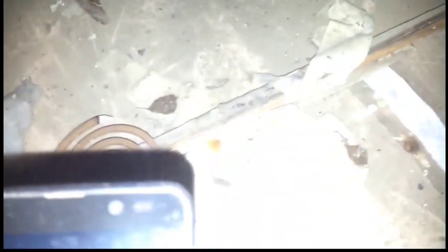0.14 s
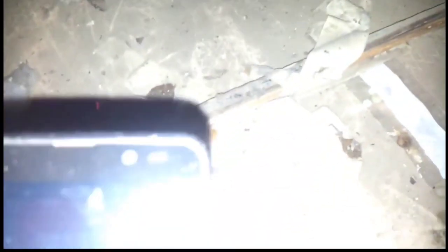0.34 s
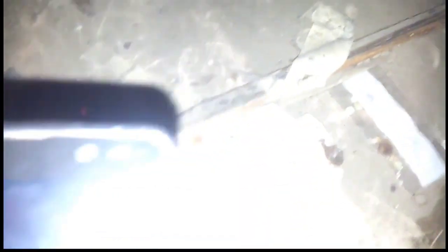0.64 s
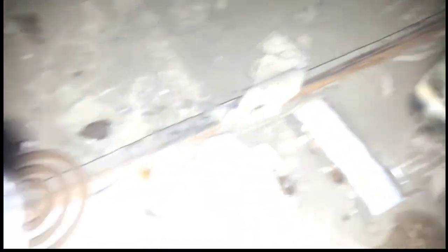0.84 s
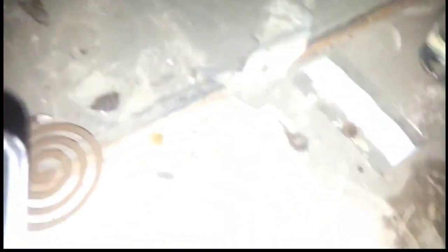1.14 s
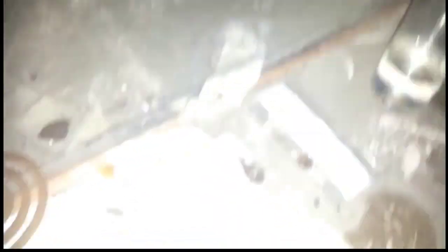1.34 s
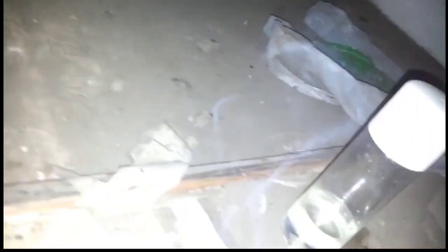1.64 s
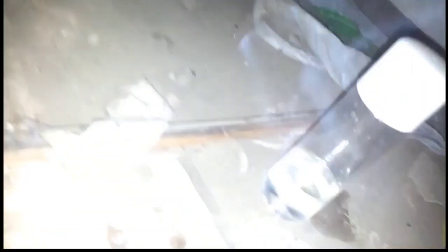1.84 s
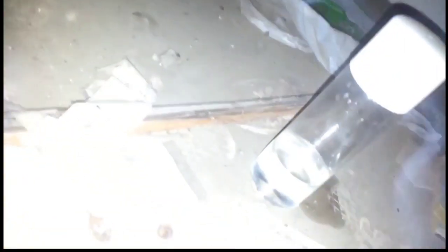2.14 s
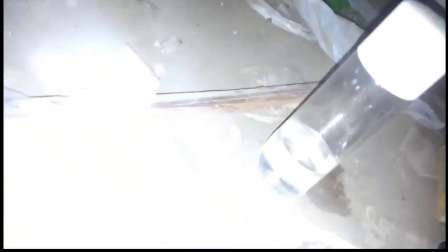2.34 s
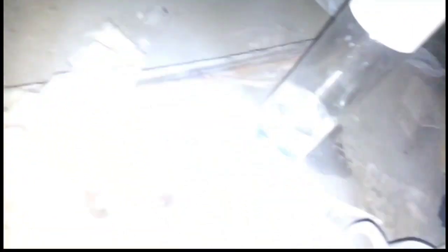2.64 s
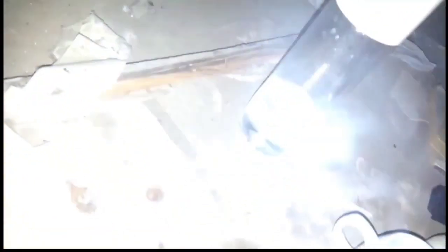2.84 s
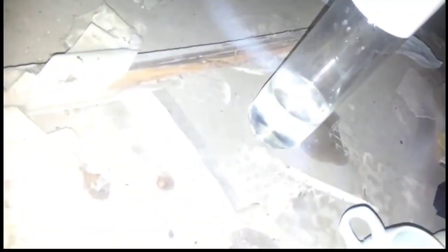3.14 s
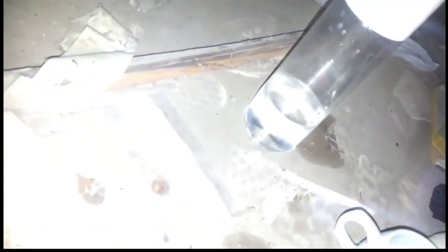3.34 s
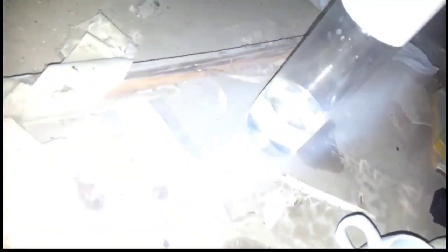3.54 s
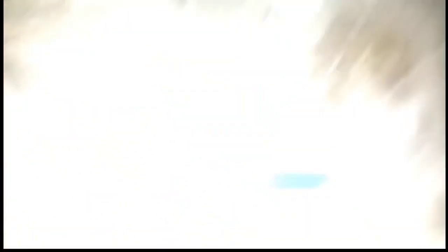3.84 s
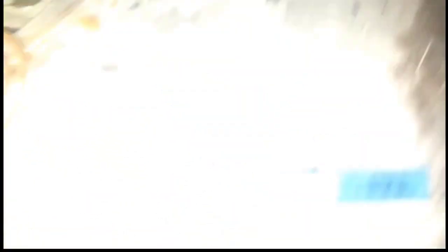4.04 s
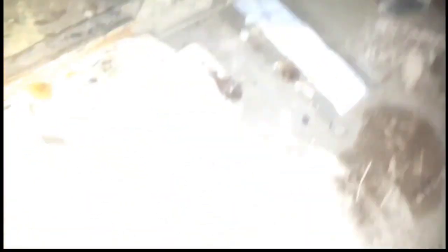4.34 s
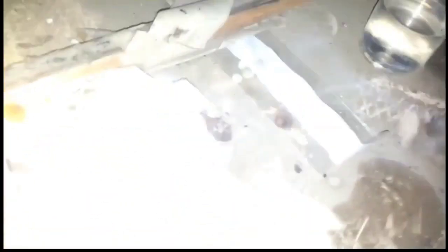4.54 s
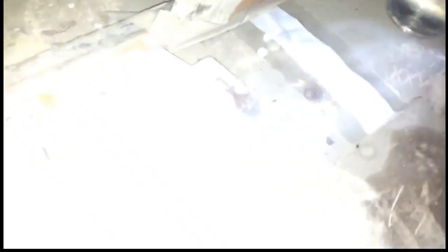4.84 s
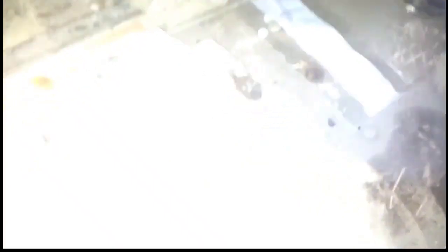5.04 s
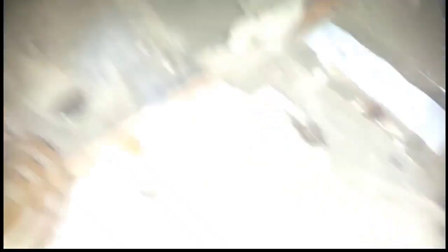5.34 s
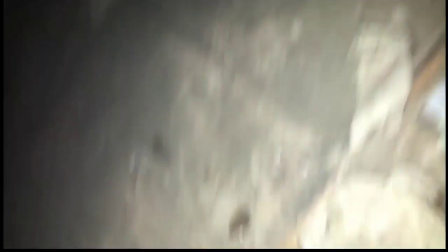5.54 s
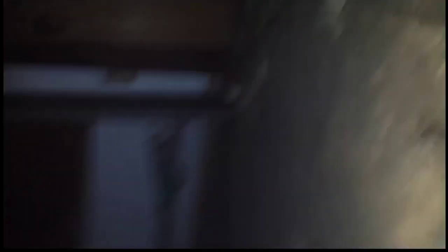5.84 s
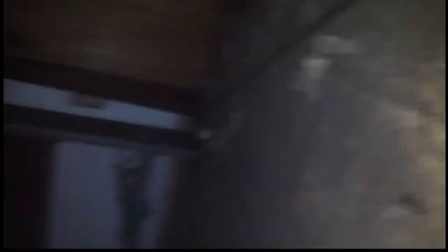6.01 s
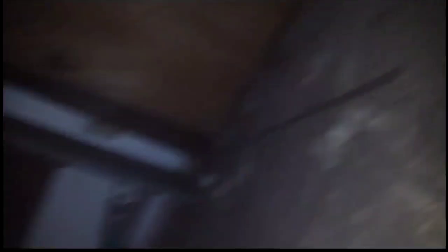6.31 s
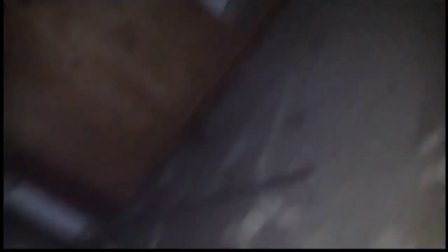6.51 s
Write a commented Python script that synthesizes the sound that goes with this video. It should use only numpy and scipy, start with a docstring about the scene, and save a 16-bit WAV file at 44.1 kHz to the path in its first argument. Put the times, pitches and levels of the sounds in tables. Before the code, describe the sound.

In a quiet room, fingers shift on a handheld camera: knocks, a gritty scrape, one overloaded bump, then faint hissy strokes and creaks.

```python
"""Fingers shifting on a handheld camera

In a quiet room, fingers shift their grip, and all of it reaches the microphone through the case.
Fingertips knock on the shell; one covers the microphone port and scrapes across it. Later the skin slides
in light strokes, hissing in the port's treble resonance, and creaks in three short pulls.
Knocks are short pushes plus ringing shell tones; rubbing is random skin catches shaped by a spectrum."""
import sys
import numpy as np
from scipy import signal
from scipy.fft import rfft, irfft, next_fast_len
from scipy.io import wavfile

SR = 44100
rng = np.random.default_rng(int(sys.argv[2]) if len(sys.argv) > 2 else 0)


def master(y):
    """Save y as 16-bit WAV."""
    cut = np.clip(np.atleast_2d(y).T, -1, 1)
    pcm = np.round(cut * 32767)  # scale
    wavfile.write(sys.argv[1], SR, pcm.astype(np.int16))


N = 294225
T = np.arange(N) / SR  # time in seconds

# The muffled sound of skin rubbing on the shell. Each row: frequency in Hz, relative level in dB.
MURMUR_COLOUR = [(20, -35.5), (60, -5.5), (130, -2.5), (380, -1.5), (900, -5.5), (2000, -10), (5000, -19.5),
                 (12000, -33.5)]


def undb(db):
    """Turn decibels into a gain."""
    return 10 ** (np.asarray(db) / 20)


def unit(x):
    """Scale to an average (rms) level of 1."""
    return x / np.sqrt(np.mean(x ** 2))


def peak(x):
    """Scale so the largest swing is 1."""
    return x / np.max(np.abs(x))


def add(out, s, sound):
    """Mix a short sound in at s seconds."""
    i = int(s * SR)
    out[i:i + len(sound)] += sound[:N - i]


def butter(x, hz, kind, order=2):
    """Filter with a low-, high- or band-pass that only looks back in time."""
    sos = signal.butter(order, np.minimum(hz, SR / 2 - 1), kind, fs=SR, output="sos")
    return signal.sosfilt(sos, x)


def colour(x, points):
    """Shape x by a spectrum of (Hz, dB) points, then scale to rms 1."""
    hz, db = np.transpose(points)
    size = next_fast_len(len(x))
    f = np.arange(size // 2 + 1) * SR / size
    gain = undb(np.interp(np.log(f + 1), np.log(hz), db))
    return unit(irfft(rfft(x, size) * gain, size)[:len(x)])


def fade(t, t60):
    """Die away exponentially, falling by 60 dB every t60 seconds."""
    return np.exp(-np.log(1000) * t / t60)


def swell(t, start, length, attack, release):
    """Rise to 1 at start, hold for length, die away; attack and release are times for 60 dB."""
    rise = fade(np.maximum(start - t, 0), attack)
    return rise * fade(np.maximum(t - start - length, 0), release)


def push(t, ms):
    """Contact force: a quick rise and a slower release, peak 1 after ms milliseconds."""
    u = t * 1000 / ms
    return (u * np.exp(1 - u)) ** 2


def walk(rate):
    """Random wander along straight lines between rate random points per second."""
    knots = rng.standard_normal(N // 8)
    return np.interp(T * rate, np.arange(len(knots)), knots)


def grains(rate, spread_db):
    """Skin ridges catch at random moments, rate per second on average, each with its own strength."""
    caught = rng.random(N) < rate / SR
    return caught * rng.choice([-1, 1], N) * undb(spread_db * rng.standard_normal(N))


def low_cut(x, hz=58, leak_hz=45):
    """The microphone's steep bass roll-off, which wobbles on after every push."""
    return butter(butter(x, hz, "high", order=5), leak_hz, "high", order=1)


def room():
    """Low rumble that follows the camera's movement, under the microphone's own even hiss."""
    # The camera is swung. Each row: start in seconds, length in seconds.
    swings = [(0, 1.54), (3.7, 0.33), (5.497, .25)]
    # Spectrum of the rumble. Each row: frequency in Hz, relative level in dB.
    rumble_colour = [(15, -57.5), (28, -26), (44, -4), (58, 0.5), (105, -7), (150, -16.5), (300, -40)]
    # Spectrum of the microphone's hiss. Each row: frequency in Hz, relative level in dB.
    floor_colour = [(20, -19), (70, -3.5), (200, -1), (400, -3.5), (1200, -7), (2500, -8), (5700, -11.5),
                    (13800, -10.5), (15000, -14.5)]
    rumble_db, floor_db = -76, -66.5
    swing_db, swing_ramp_s = 7, 1.2  # dB added at full swing; 60 dB time of the swell curve
    turn_s, turn_length_s, turn_db = 5.8, .3, -7  # the rumble drops as the camera turns away

    swung = sum(swell(T, s, length, swing_ramp_s, swing_ramp_s) for s, length in swings)
    turned = np.clip((T - turn_s) / turn_length_s, 0, 1)
    rumble_level = undb(rumble_db + swing_db * swung + turn_db * turned)
    rumble = rumble_level * colour(rng.standard_normal(N), rumble_colour)
    return rumble + undb(floor_db) * colour(rng.standard_normal(N), floor_colour)


def knocks():
    """Each knock is a pressure pulse, a slower flex of the shell the other way and a crack of its modes."""
    # Fingertips hit the case. Each row: start in seconds, pulse level in dB before the bass cut,
    # contact time in ms, shell flex in dB before the bass cut, flex time in ms, crack level in dB.
    knock_rows = [(1.0592, -30, .1, -29, 1.8, -38), (1.0897, -41.5, 0.28, -36, 1.8, -58),
                  (1.1196, -37, 0.27, -38, 1.5, -57), (1.1485, -31, 0.77, -34, 2.5, -47),
                  (1.1654, -9, 0.44, -17.5, 1.8, -40), (1.4796, -13, 0.15, -19.5, 1.57, -25),
                  (1.4817, -25, 0.12, -35, 0.66, -23.5), (3.6455, -61, 1, -36.5, 3.8, -80),
                  (3.8882, -33, .45, -26.5, 3.8, -52), (4.0350, -35.5, .24, -47.5, 1, -54.5),
                  (4.0547, -18, 0.38, -24, 1.4, -39.5), (4.0571, -1, .22, -9, .91, 2.5),
                  (4.4037, -32, .34, -43, 0.75, -43), (5.318, -45, 0.61, -52, .57, -66),
                  (5.4171, -29.5, .39, -51, .4, -38), (5.661, -47, 0.26, -53, 1, -58)]
    # Ringing tones of the shell. Each row: frequency in Hz, 60 dB fade time in seconds, relative level in dB.
    shell_modes = [(790, .012, 1), (1120, .012, -0.5), (1840, .008, -11), (3550, 0.0073, -0.5),
                   (4760, 0.0036, -5), (6247, 0.0093, 0.5), (7400, 0.0055, -2), (8700, 0.004, -2)]
    brush_db, brush_t60_s = -34.5, .044  # brushing against knock strength; 60 dB time on either side

    t = T[:SR // 5]
    pressure, cracks, contact = np.zeros(N), np.zeros(N), np.zeros(N)
    ring = peak(sum(undb(db) * fade(t, t60) * np.sin(2 * np.pi * hz * t) for hz, t60, db in shell_modes))
    for s, db, contact_ms, flex_db, flex_ms, crack_db in knock_rows:
        blow = peak(butter(push(t, contact_ms), 400, "high", order=1))
        add(pressure, s, -undb(db) * blow)
        # the shell gives at the top of the push
        top_s = s + contact_ms / 1000
        add(pressure, top_s, undb(flex_db) * push(t, flex_ms))
        crunch = butter(rng.standard_normal(len(t)), 5000, "low", order=1) * fade(t, 0.027)
        add(cracks, top_s, undb(crack_db) * (0.074 * crunch + ring))
        contact += undb(db) * fade(np.abs(T - s), brush_t60_s)
    # skin brushes the shell as it lands and lifts
    brush = undb(brush_db) * contact * colour(grains(4000, 2.5), MURMUR_COLOUR)
    return low_cut(pressure) + cracks + brush


def slips(events):
    """Every slip (seconds, tick dB, body dB) ticks in the port resonance and nudges the shell."""
    port_hz, port_width_hz = 10700, 1300
    band = port_hz + np.array([-1, 1]) * port_width_hz / 2
    t, ticks, body = T[:SR // 50], np.zeros(N), np.zeros(N)
    for s, tick_db, body_db in events:
        envelope = (fade(t, 0.0045) + 0.073 * fade(t, 0.014)) * (1 - fade(t, 0.0016))
        snap = rng.standard_normal(len(t)) * envelope
        rung = butter(snap, band, "band", order=1)
        add(ticks, s, undb(tick_db) * peak(rung + 0.056 * snap))
        add(body, s, -undb(body_db) * push(t, 0.24))
    return ticks + butter(body, 214, "high")


def press():
    """A tense fingertip shudders on the shell, and rustles dully once it starts to give."""
    press_s, give_s, end_s = 1.093, 1.153, 1.18
    attack_s, release_s = 0.13, .1  # times to rise and fall by 60 dB
    tremor_hz, tremor_db, rustle_db = 64, -36.5, -47

    tremor = swell(T, press_s, end_s - press_s, attack_s, release_s)
    rustle = swell(T, give_s, end_s - give_s, attack_s, release_s)
    wandering_hz = tremor_hz * (1 + 0.16 * walk(45))
    shudder = np.sqrt(2) * np.sin(2 * np.pi * np.cumsum(wandering_hz) / SR)  # rms near 1
    rub = colour(grains(2500, 4), MURMUR_COLOUR)
    return undb(tremor_db) * tremor * shudder + undb(rustle_db) * rustle * rub


def scrape():
    """Dense catches right at the port, duller as the pressure eases, over buffeting air."""
    # Strength of the scrape over time. Each row: time in seconds, friction level in dB.
    friction_points = [(1.222, -63), (1.252, -36.5), (1.262, -18.5), (1.281, -20), (1.29, -15),
                       (1.338, -15.5), (1.36, -23.5), (1.383, -29), (1.437, -67.5)]
    # Spectrum of the gritty catches. Each row: frequency in Hz, relative level in dB.
    grit_colour = [(100, -20), (350, -7.5), (550, -1.5), (1000, -2), (1500, -2.5), (2200, -2.5),
                   (3500, -4.5), (5000, -8), (7500, -16), (10300, -20.5), (12300, -35), (15000, -52)]
    # Spectrum of the buffeting air. Each row: frequency in Hz, relative level in dB.
    buffet_colour = [(25, -51.5), (55, -8.5), (140, -9.5), (180, -5.5), (208, -0.5), (255, -5.5),
                     (320, -4.5), (520, -9.5), (900, -26.5), (10000, -29), (15000, -42)]
    grit_db, buffet_db = 0.6, -6.5  # against the friction level

    friction = undb(np.interp(T, *np.transpose(friction_points), left=-np.inf, right=-np.inf))
    rough = colour(grains(11000, 2.2) * undb(1.7 * walk(400)), grit_colour)
    dull = butter(rough, 1500, "low", order=1)
    pressure = (friction / friction.max()) ** .4
    grit = dull + pressure * (rough - dull)
    buffet = colour(grains(2500, 4.4), buffet_colour)
    return friction * (undb(grit_db) * grit + undb(buffet_db) * buffet)


def seals():
    """Air trapped under the fingertip swings for a few cycles, rising in pitch as the pocket shrinks."""
    # The fingertip seals the port. Each row: start in seconds, level in dB before fading and bass cut,
    # first pitch in Hz, last pitch in Hz, length in seconds.
    seal_rows = [(1.259, 2.5, 142, 275, .0132), (1.2845, -10.5, 205, 232.8, .024)]
    out = np.zeros(N)
    for s, db, first_hz, last_hz, length in seal_rows:
        t = T[:int(length * SR)]
        pitch_hz = np.linspace(first_hz, last_hz, len(t))
        swing = np.sin(2 * np.pi * np.cumsum(pitch_hz) / SR)
        add(out, s, undb(db) * swing * signal.windows.tukey(len(t), .2) * fade(t, 0.091))
    return butter(out, 49, "high", order=3)


def skid():
    """The finger slides off the hardest knock and slows at once."""
    # Spectrum of the skid. Each row: frequency in Hz, relative level in dB.
    skid_colour = [(120, -39.5), (200, -9), (344, -4), (833, -10.5), (963, -7), (1600, -11.5), (2420, -9),
                   (4310, -16), (10500, -4.5), (15000, -16)]
    start_s, level_db, t60_s = 4.058, -20.5, 0.099
    slide = (T > start_s) * fade(np.abs(T - start_s), t60_s)
    return undb(level_db) * slide * colour(grains(9000, 3), skid_colour)


def strokes():
    """Sliding skin hisses in the port, whose resonance shifts with the finger; a firm grip also stirs the shell."""
    # Light strokes of the hand. Each row: start in seconds, length in seconds, hiss level in dB,
    # port resonance in Hz.
    stroke_rows = [(4.174, .06, -63.5, 11500), (4.254, 0.021, -47.5, 11400), (4.318, 0.052, -53.5, 11400),
                   (4.398, .014, -47, 11500), (5.024, .018, -58.5, 11500), (5.261, 0.028, -56.5, 10500),
                   (5.343, 0.083, -51.5, 10740), (5.591, .012, -55.5, 11100), (5.645, 0.021, -49, 11130),
                   (5.71, 0.068, -55, 11100), (5.822, 0.036, -56.5, 11100), (5.972, 0.066, -51, 11100),
                   (6.072, 0.022, -49, 11000), (6.126, 0.027, -57.5, 11100), (6.224, .02, -58, 11020),
                   (6.332, 0.088, -49, 11140), (6.523, 0.038, -59.5, 11200), (6.658, .02, -57.5, 11150)]
    # Spectrum of the hiss. Each row: frequency in Hz, relative level in dB.
    hiss_colour = [(500, -32), (2000, -29), (3500, -18), (5200, -15), (6400, -19), (8300, -14.5),
                   (9800, -5.5), (11100, -0.5), (12300, -6.5), (14000, -11.5), (15000, -18)]
    hiss_peak_hz = 11120  # where the port resonance lies in that spectrum
    rest_s, rest_db = 4.11, -70.5  # from here on the hand never lies quite still
    # the shell's share of a stroke before and after the grip loosens
    loosen_s, firm_db, loose_db = 5.45, -8, -21

    skin = grains(13000, 2.6) * undb(1.8 * walk(90))
    speed = undb(rest_db) * (T > rest_s)
    hiss = speed * colour(grains(13000, 2.6), hiss_colour)
    for s, length, db, port_hz in stroke_rows:
        # a short stroke starts and stops more briskly than a long one: 60 dB times in seconds
        attack, release = 2.1 * length, 0.072 + 1.23 * length
        near = (T > s - attack) & (T < s + length + release)
        move = undb(db) * swell(T[near], s, length, attack, release)
        shifted_colour = np.array(hiss_colour) * [port_hz / hiss_peak_hz, 1]
        hiss[near] += move * colour(skin[near], shifted_colour)
        speed[near] = np.hypot(speed[near], move)
    grip = undb(np.where(T < loosen_s, firm_db, loose_db))
    return hiss + grip * speed * colour(grains(3000, 4), MURMUR_COLOUR)


def creak():
    """Skin pulled over the shell sticks and slips at a nearly even rate, over jerky friction."""
    # Creaking pulls. Each row: start in seconds, length in seconds, friction level in dB, slips per second.
    pulls = [(5.0422, 0.031, -39.5, 82), (5.086, 0.035, -38, 93), (5.1316, .036, -36, 168)]
    # Spectrum of the friction. Each row: frequency in Hz, relative level in dB.
    drag_colour = [(35, -40.5), (60, -7), (195, 0.5), (276, -4), (491, -2.5), (727, -7), (1030, -7),
                   (1830, -9.5), (3050, -10), (7000, -15.5), (11600, -2.5), (14000, -10), (15000, -20)]
    attack_s, release_s = 0.011, 0.085  # times to rise and fall by 60 dB
    tick_db, body_base_db = 13.5, 7.5  # against the friction level, the body at 100 slips per second
    body_db_per_octave = 7  # faster slipping shakes the shell harder
    jitter, scatter_db = .06, 1.5  # random timing in slip periods; random strength

    friction = sum(undb(db) * swell(T, s, length, attack_s, release_s) for s, length, db, _ in pulls)
    jerks = friction * colour(grains(10000, 2.6) * undb(1.8 * walk(400)), drag_colour)
    events = []
    for s, length, db, rate in pulls:
        body_db = body_base_db + body_db_per_octave * np.log2(rate / 100)
        count = round(length * rate + .5)
        for k, (late, strong) in enumerate(rng.standard_normal((count, 2))):
            slip_s = s + (k + jitter * late) / rate
            slip_db = db + scatter_db * strong
            events.append((slip_s, slip_db + tick_db, slip_db + body_db))
    return jerks + slips(events)


def scene():
    """One microphone feeds both channels."""
    # Lone snaps of skin letting go. Each row: start in seconds, tick level in dB,
    # body level in dB before its bass cut.
    lone_slips = [(1.0598, -39.5, -56), (4.2555, -35, -44), (4.3933, -14.5, -36.5), (5.0902, -19.5, -33),
                  (5.172, -15, -31), (5.3883, -35, -52), (5.6035, -39, -64), (5.6425, -40, -62),
                  (6.03, -33, -64)]
    mono = room() + knocks() + slips(lone_slips) + press() + scrape() + seals()
    mono = mono + skid() + strokes() + creak()
    return np.array([mono, mono])


def record(dry):
    """The hardest bumps overload the input and are clipped; then the top is cut above 14.6 kHz."""
    clipped = np.clip(dry, -1, 1)
    top_cut = signal.ellip(10, .1, 70, 14600, fs=SR, output="sos")
    return signal.sosfilt(top_cut, clipped)


dry = scene()
out = record(dry)
master(out)
```